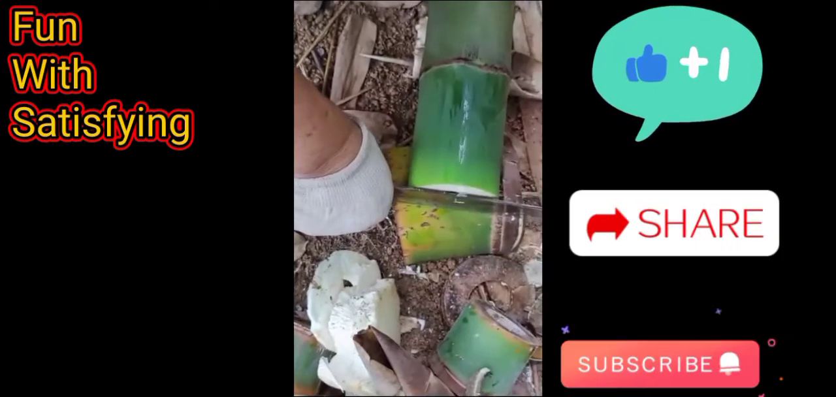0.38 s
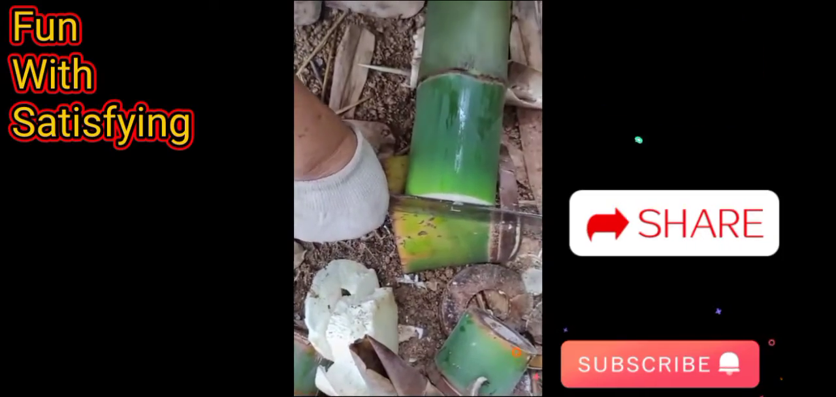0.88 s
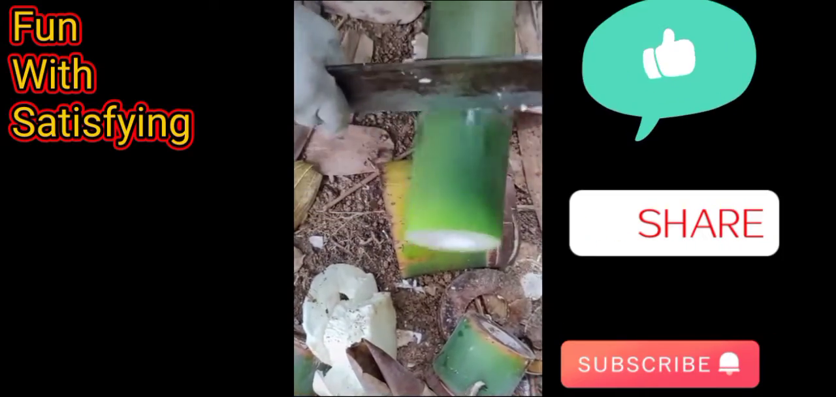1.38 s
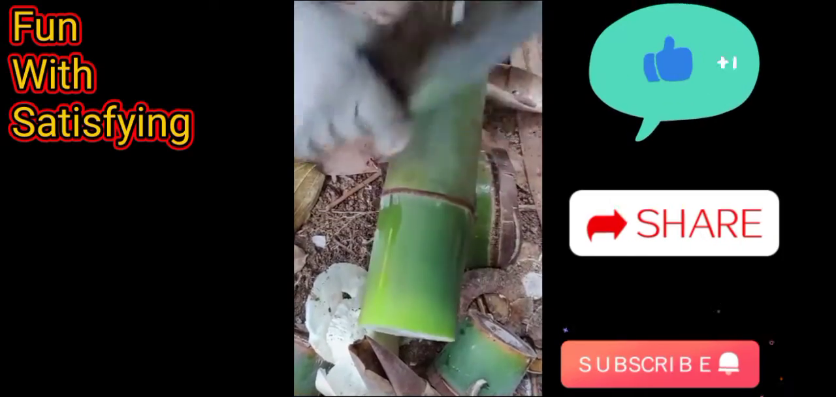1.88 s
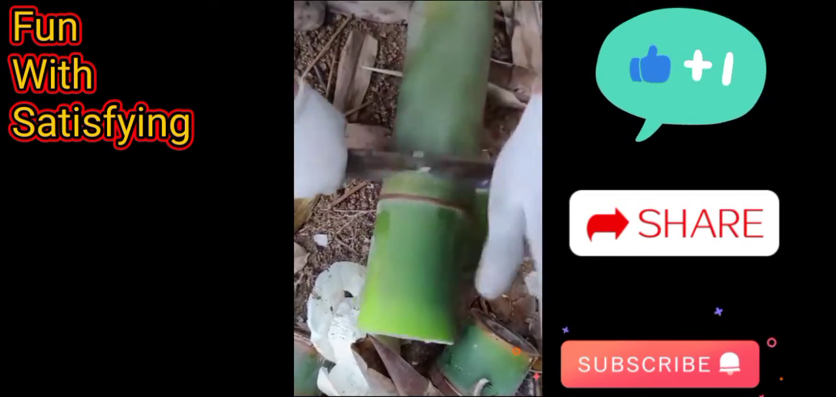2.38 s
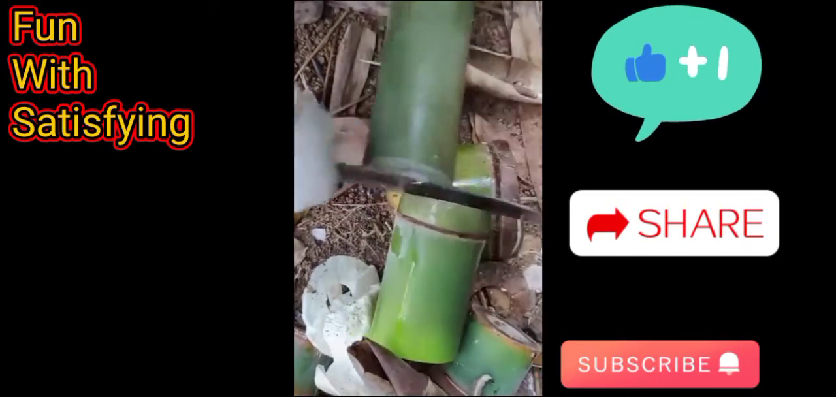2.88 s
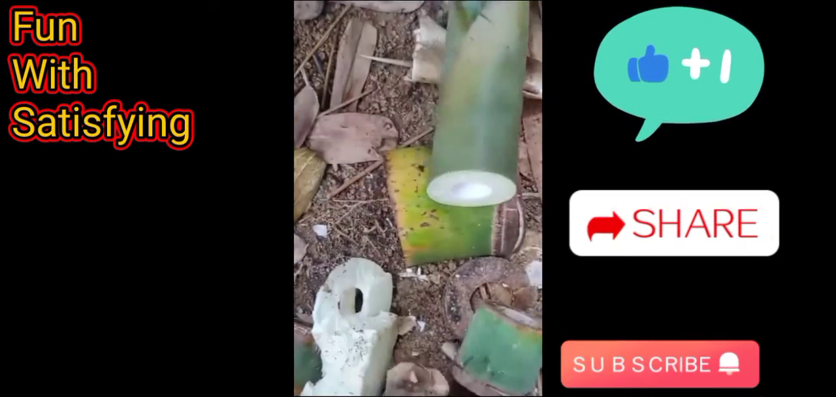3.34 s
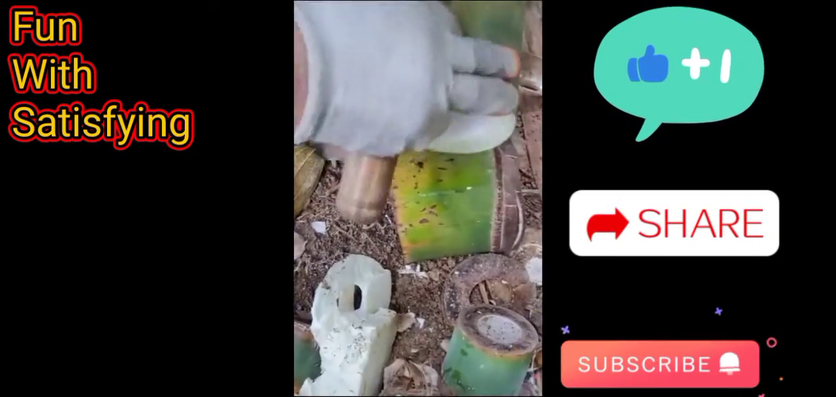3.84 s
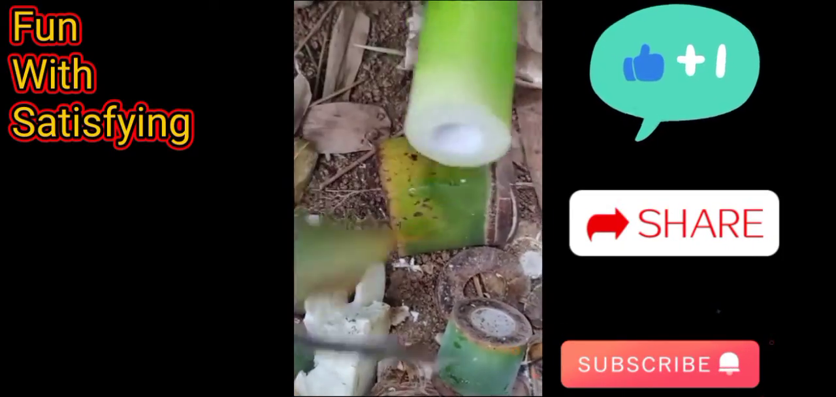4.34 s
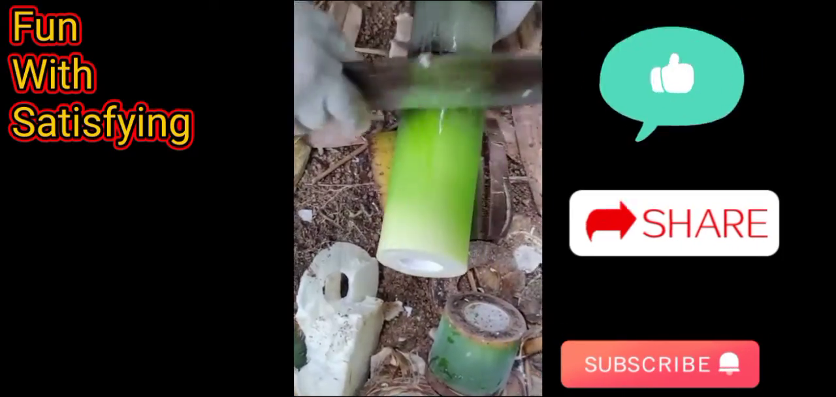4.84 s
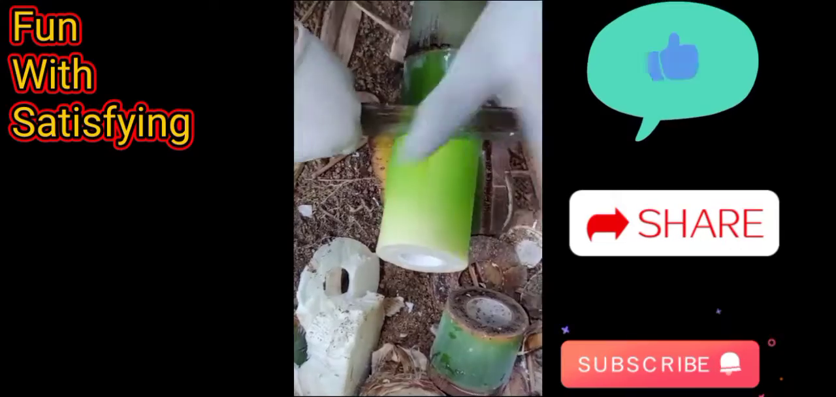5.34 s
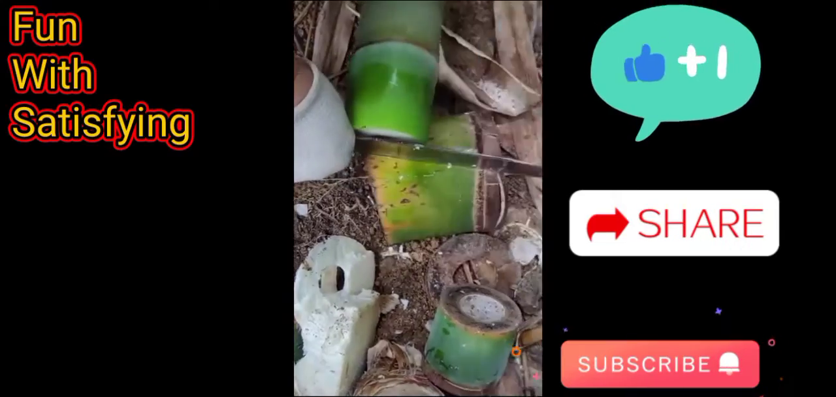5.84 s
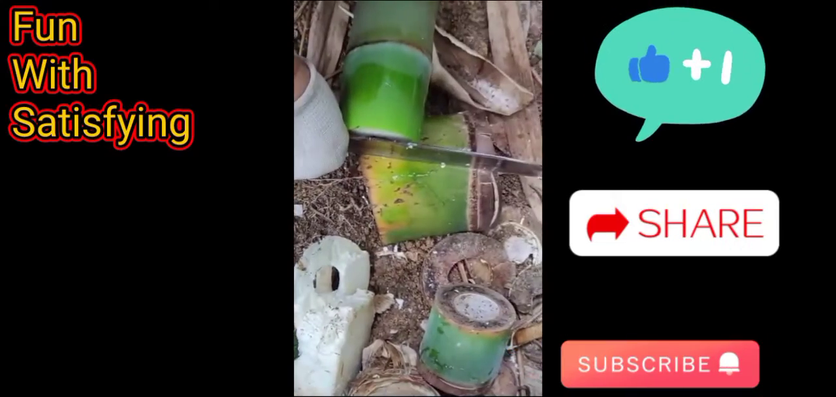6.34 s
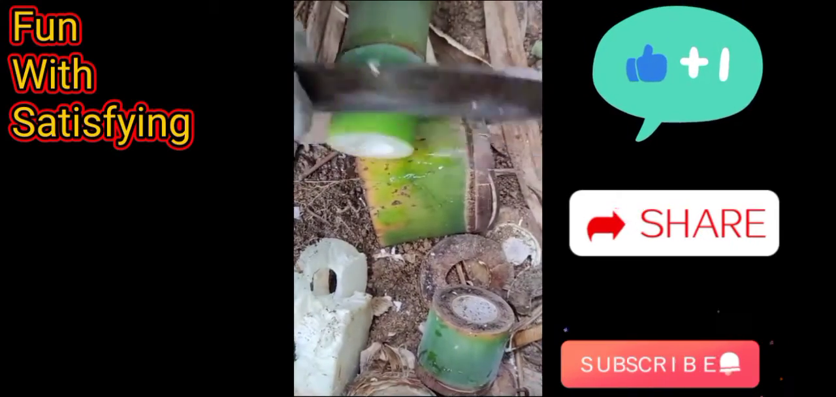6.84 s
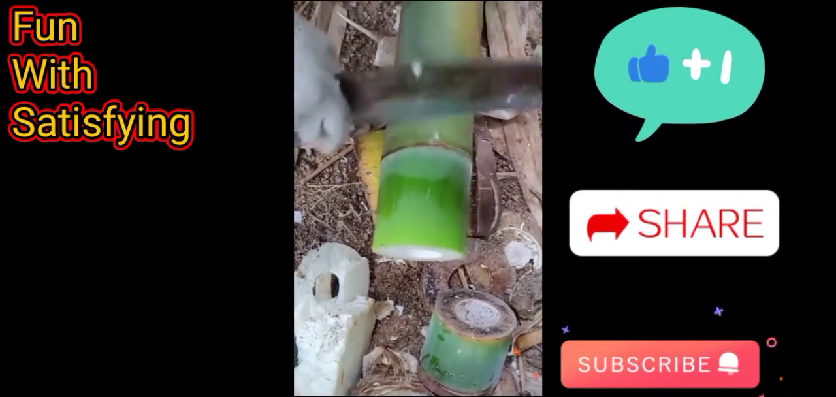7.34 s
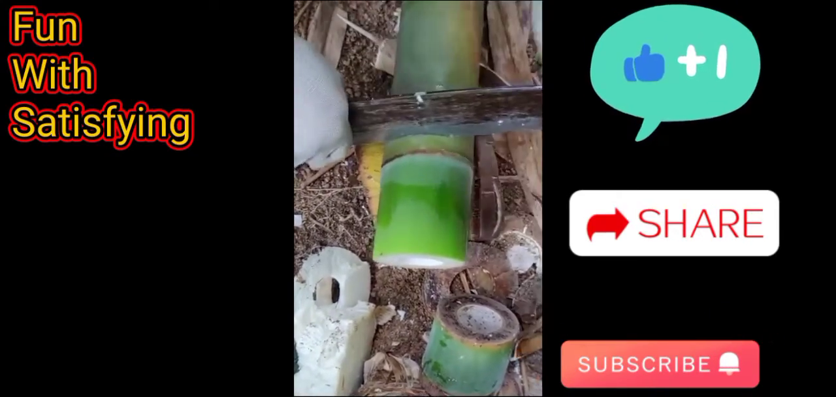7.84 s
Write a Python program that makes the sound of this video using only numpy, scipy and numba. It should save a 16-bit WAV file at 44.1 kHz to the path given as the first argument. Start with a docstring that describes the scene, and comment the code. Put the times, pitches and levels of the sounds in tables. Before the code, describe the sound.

Near microphone, no room echo, only slight scatter from leaves and ground. Green bamboo splits in brief bursts: a single cut, a denser crackling run of hollow knocks, a quieter handling passage with thumps and small squeaks, then more bright cracks and a short creak. A heavy low thump follows, and the last cut ends in rapid snapping and high metallic shimmer. Soft wind and distant insects underneath.

```python
"""Low wind rumble, far insects and a faint rustle; then a long knife is pressed through green bamboo outdoors.
Fibres crunch and crack: random snaps and clicks excite the wall, fine grain and hollow section.
Blade and pieces thud on the soil (swinging sines) and the stalk's air column hums after.
The blade creaks (pulse train) and rings (narrow steel modes).
Thin chirps, squeaks and swishes are noise through gliding resonances."""
import sys
import numpy as np
from scipy import signal
from scipy.fft import rfft, irfft, next_fast_len
from scipy.io import wavfile
from scipy.ndimage import uniform_filter1d
from numba import njit

SR = 44100
rng = np.random.default_rng(int(sys.argv[2]) if len(sys.argv) > 2 else 0)


def waveform_to_disk(signal):
    """Save audio, clipped to [-1, 1], as 16-bit WAV at the path in sys.argv[1]."""
    frames = np.transpose(np.atleast_2d(signal))
    scaled = np.clip(frames, -1, 1) * 32767
    samples = np.round(scaled).astype(np.int16)
    wavfile.write(sys.argv[1], SR, samples)


def ratio_of_db(decibels):
    """Turn decibels (scalar or array-like) into linear amplitude factors; 0 dB maps to 1."""
    return 10 ** (np.asarray(decibels, float) / 20)


N = 362061
TIME = np.arange(N) / SR


def level(x, db):
    """Scale to an rms level."""
    return x * ratio_of_db(db) / np.sqrt(np.mean(x ** 2))


def crest(x, db):
    """Scale to a peak level."""
    return x * ratio_of_db(db) / np.max(np.abs(x))


def add(track, s, x):
    """Mix a short sound in at time s."""
    i = max(int(s * SR), 0)
    track[i:i + len(x)] += x[:max(N - i, 0)]


def curve(rows):
    """Columns of a table, one value per sample."""
    s, *columns = np.transpose(rows)
    return [np.interp(TIME, s, c) for c in columns]


@njit
def svf(x, hz, width):
    """State-variable band-pass with moving centre and width, gain 1 at the centre."""
    y, b, l = np.empty(len(x)), 0., 0.
    for i in range(len(x)):
        g, k = np.tan(np.pi * hz[i] / SR), width[i] / hz[i]
        v = (b + g * (x[i] - l)) / (1 + g * (g + k))
        b, l, y[i] = 2 * v - b, l + 2 * g * v, k * v
    return y


def band(x, hz, width):
    """Fixed band-pass."""
    return svf(x, np.full(len(x), 1. * hz), np.full(len(x), 1. * width))


def colour(x, points):
    """Shape by a spectrum drawn on log frequency."""
    hz, db = np.transpose(points)
    size = next_fast_len(len(x))
    f = np.arange(size // 2 + 1) * SR / size + 1
    gain = ratio_of_db(np.interp(np.log(f), np.log(hz), db))
    return irfft(rfft(x, size) * gain, size)[:len(x)]


def walk(rate):
    """Random levels held 1 / rate s and slewed twice; spread near 1."""
    k = int(SR / rate)
    steps = np.repeat(rng.standard_normal(N // k + 1), k)
    return 1.17 * uniform_filter1d(uniform_filter1d(steps, k), k)[:N]


# far hiss spectrum: (frequency [Hz], relative density [dB per Hz])
AIR_SPECTRUM = [(15, -40), (25, -8), (70, 1.5), (123, -16.5), (175, -9.5), (236, -16), (1940, -40),
                (4140, -45.5), (5140, -27.5), (7510, -48.5), (8830, -28), (9570, -40), (14800, -38),
                (16000, -38.5)]
# rumble before the low cut: (time [s], level [dB])
GUST = [(0, -65.5), (1.1, -70), (2.2, -67.5), (5.5, -64), (8.21, -64)]


def outdoors():
    """Far hiss with two insect bands, and gusty wind rumble, with the deepest bass cut."""
    hiss = level(colour(rng.standard_normal(N), AIR_SPECTRUM), -65)
    air = hiss * ratio_of_db(1.8 * walk(5))
    gusts = rng.standard_normal(N) * ratio_of_db(3 * walk(12))
    wind = band(band(gusts, 66, 50), 75, 120)
    gust_db, = curve(GUST)
    low_cut = signal.butter(4, 46, "highpass", fs=SR, output="sos")
    return signal.sosfilt(low_cut, air + level(wind, 0) * ratio_of_db(gust_db))


# thin chirps, squeaks and swishes:
# (time [s], length [s], start [Hz], end [Hz], width [Hz], rms before fades [dB])
SWISH = [(0.045, 0.056, 3590, 3330, 490, -65.5), (0.118, 0.055, 3430, 3280, 490, -64),
         (2.064, 0.04, 2960, 2910, 140, -48), (4.263, .078, 3310, 3240, 240, -52.5),
         (4.315, .029, 885, 905, 140, -46.5), (5.063, .023, 1085, 1075, 110, -45.5),
         (5.107, 0.025, 3360, 3790, 190, -57.5), (5.127, .023, 3310, 3010, 140, -54.5),
         (5.1265, .023, 6340, 6160, 190, -57.5), (5.495, .027, 1410, 3890, 140, -62),
         (5.633, .013, 2710, 2690, 240, -67.5), (5.667, .024, 3360, 3310, 240, -69.5),
         (5.837, .079, 2180, 2160, 490, -73.5), (6.672, 0.036, 3740, 3760, 90, -66),
         (6.747, .029, 3140, 3060, 190, -47), (7.396, .024, 885, 905, 85, -54.5),
         (7.421, .064, 1855, 1895, 140, -60.5)]


def swishes():
    """Thin chirps, squeaks and swishes, some perhaps insect or bird, others rubbing: noise in a gliding resonance."""
    out = np.zeros(N)
    for s, length_s, hz0, hz1, width_hz, db in SWISH:
        size = int(length_s * SR)
        glide = np.linspace(hz0, hz1, size)
        swish = svf(rng.standard_normal(8192)[:size], glide, np.full(size, 1. * width_hz))
        add(out, s, level(swish, db) * np.sqrt(np.hanning(size)))
    return out


BLADE_HZ, BLADE_WIDTH_HZ = 12000, 110
# ring of the sliding blade: (time [s], level [dB])
BLADE = [(7.9, -63), (7.93, -80), (7.955, -70), (7.97, -46), (8.04, -41), (8.06, -61), (8.08, -53),
         (8.1, -71)]
# fainter steel modes: (centre [Hz], width [Hz], gain re main mode [dB])
STEEL = [(10170, 300, -12), (11200, 200, -12), (13100, 200, -19), (15200, 300, -20)]


def blade():
    """Narrow high modes of the steel, excited in fits by the sliding."""
    db, = curve(BLADE)
    sliding = (TIME > BLADE[0][0]) & (TIME < BLADE[-1][0])
    fits = rng.standard_normal(N) * ratio_of_db(3.5 * walk(120))
    ring = band(fits, BLADE_HZ, BLADE_WIDTH_HZ)
    for hz, width_hz, mode_db in STEEL:
        ring = ring + ratio_of_db(mode_db) * band(fits, hz, width_hz)
    return level(ring, 0) * ratio_of_db(db) * sliding


# wall modes: (centre [Hz], width [Hz], gain before the broad band-pass [dB])
FIBRE = [(1500, 860, -18.5), (2335, 1470, -10.5), (3115, 343, 1), (3520, 1190, 1.5), (4053, 1740, -4)]


def fibre(x):
    """The broad resonances of the green wall, which is too stiff to give much bass."""
    modes = sum((-1) ** k * ratio_of_db(db) * band(x, hz, width) for k, (hz, width, db) in enumerate(FIBRE))
    return band(modes, 2280, 4870)


# fine-grain spectrum: (frequency [Hz], relative density [dB per Hz])
HISS = [(2650, -40), (4500, 6), (4600, -3.5), (5140, -14.5), (5280, -6), (6700, -2), (8030, -9),
        (11500, -5), (14500, -8), (16000, -30)]


def grain(x):
    """The fine grain answers with a treble-heavy hiss."""
    return colour(x, HISS)


# blade sticking and slipping in the cut:
# (start [s], end [s], start rate [slips/s], end rate [slips/s], peak [dB])
CREAK = (6.885, 6.93, 290, 340, -30)


def creak():
    """Nearly regular slips, each ringing the wall."""
    start, end, rate0, rate1, db = CREAK
    slips, s = np.zeros(N), start
    for jitter, size in rng.standard_normal((40, 2)):
        if s < end:
            slips[int(s * SR)] = ratio_of_db(2.0 * size - 6 * (s - start) / (end - start))
        s += (1 + 0.045 * jitter) / np.interp(s, (start, end), (rate0, rate1))
    ring = 5.7 * band(slips, 3300, 320)
    return crest(fibre(slips) + ring + ratio_of_db(-7.0) * grain(slips), db)


# blows into the soil: (crest time [s], peak [dB], settled swing [Hz], cycles to fall about 20 dB)
THUDS = [(0.437, -27, 83, 0.58), (0.82, -39, 72.3, 1.9), (1.834, -43, 101, 1.3), (2.0606, -22.5, 298, 0.76),
         (2.142, -41.5, 88, 1.7), (3.093, -33.5, 121, 1.1), (3.477, -26.5, 85.5, 0.92),
         (3.52, -46, 110, 0.89), (3.918, -47.5, 119, 1.2), (4.344, -29.5, 95.6, 1.5),
         (5.0717, -33, 95, 3.3), (5.238, -51.5, 149, 7.2), (5.9303, -24.5, 100, 0.94),
         (5.959, -33.5, 106.6, 3.1), (6.389, -33, 70.3, 2.6), (6.72, -45, 67, 2.7),
         (7.546, -46.5, 73.6, 2.8), (7.621, -21.5, 102, 0.76)]
# air column of the long stalk, knocked: (time [s], sine level before decay [dB], pitch [Hz], t60 [s])
TUBE = [(1.289, -52.5, 378, 0.19), (1.72, -56, 421, 0.25), (3.476, -44.5, 452, 0.19),
        (3.85, -47, 450, 0.27), (4.251, -53, 425, 0.29), (5.3, -69, 458, 0.76), (7.625, -35.5, 606, 0.066)]


def thuds():
    """The soil dips, springs back fast to one crest and swings out ever slower; the stalk's air column hums after."""
    out = np.zeros(N)
    t = np.arange(-int(.02 * SR), int(.1 * SR)) / SR
    after = np.maximum(t, 0)
    for s, db, hz, cycles in THUDS:
        swing_s = t + 0.00054 * (1 - np.exp(-after / 0.0011))
        turns = hz * np.where(t < 0, 1.85 * t, swing_s)
        decay = np.exp(-after * hz / max(cycles, .2) * 2.24)
        shape = np.where(t < 0, np.exp(-(turns / 0.5) ** 4), decay)
        add(out, s + t[0], ratio_of_db(db) * shape * np.cos(2 * np.pi * turns))
    t = np.arange(int(.5 * SR)) / SR
    onset = 1 - np.exp(-t / 0.0036)
    for (s, db, hz, t60), rough in zip(TUBE, rng.standard_normal((len(TUBE), len(t)))):
        hum = np.sin(2 * np.pi * hz * t) + level(band(rough, hz, 70), -8)
        add(out, s, ratio_of_db(db) * hum * np.exp(-np.log(1000) * t / t60) * onset)
    return out


HELD_SHARE, HELD_AFTER_S = 0.6, .11
# blade pressed through the wall:
# (start [s], length [s], crunch at end [dB], swell [dB], drone re crunch [dB])
CUTS = [(1.196, 0.075, -37, 8.5, -6), (2.683, 0.088, -43, 11.5, -5.5), (4.25, 0.094, -48, 10, 0),
        (6.722, 0.11, -44, 3.5, -2.5), (7.966, 0.12, -40, 13.5, -10)]


def held(s):
    """The blade in the cut holds the wall: share of its free length that a crack lasts at time s."""
    in_cut = any(start < s < start + length + HELD_AFTER_S for start, length, *_ in CUTS)
    return HELD_SHARE if in_cut else 1


SPLINTERS_PER_S = 60
SPLINTER_DB, SPLINTER_SPREAD_DB = 2, 2  # least level over the crunch, mean random excess


def splinters():
    """Small cracks at random moments of each cut, rising with the swell of its crunch."""
    rows, (when, pitch, _) = [], np.transpose(SECTION)
    for s, length, db, swell_db, drone_db in CUTS:
        for place, a, b, c in rng.random((20, 4))[:int(SPLINTERS_PER_S * length)]:
            pressed_db = db - swell_db * (1 - place)
            sizes = pressed_db + SPLINTER_DB - SPLINTER_SPREAD_DB * np.log([a, b, c])
            at = s + place * length
            hz = np.interp(at, when, pitch) * 2 ** (c - .5)
            rows.append((at, sizes[0], sizes[1], sizes[2] + drone_db - 8, hz))
    return rows


CRACK_MS, CRACK_CYCLES = 2.0, 2.5  # free time to fall about 10 dB: fixed part + cycles of the hollow
CLICK = 5.17  # first click, re rms of the splintering noise
# cracks and knocks:
# (time [s], wall peak [dB], snap peak + 0.5 [dB], hollow peak [dB], hollow pitch [Hz])
CRACKS = [(0.4289, -53, -45, -42, 396), (0.626, -65, -71, -56.5, 543), (0.8086, -28, -21.5, -36.5, 1430),
          (0.812, -45, -27.5, -38.5, 820), (0.8177, -41, -45, -45.5, 483), (0.831, -39, -27.5, -46, 1270),
          (1.235, -31, -26, -41, 1170), (1.2728, -39, -20, -36, 1480), (1.668, -53, -52, -58, 1000),
          (1.728, -58, -60, -56, 900), (1.8329, -60, -49, -35, 1020), (1.866, -39.5, -50, -47.5, 690),
          (1.915, -61, -60, -45.5, 2050), (2.0595, -28.5, -35, -31, 640), (2.073, -40, -48, -42, 800),
          (2.134, -50, -60, -43, 805), (2.156, -57, -62, -55, 900), (2.186, -62, -56, -48.5, 614),
          (2.203, -48, -58, -65, 1280), (2.249, -62, -66, -54, 700), (2.341, -59, -62, -63, 1390),
          (2.362, -60, -62, -65, 1490), (2.428, -57, -62, -78, 2000), (2.478, -56, -64, -75, 2000),
          (2.627, -46.5, -55, -54, 1390), (2.6841, -34.5, -43, -55, 1870), (2.7331, -27, -24, -35.5, 2050),
          (2.75, -27, -26, -44, 1450), (2.7615, -25, -31, -29.5, 1860), (2.7898, -30, -48.5, -29.5, 644),
          (2.7937, -27.5, -43, -28.5, 1480), (2.82, -33, -25, -51, 2000), (2.8653, -21, -28.5, -22, 863),
          (2.899, -47, -53, -39, 810), (2.9764, -37, -44, -47, 884), (3.0258, -39, -40.5, -37, 784),
          (3.043, -54, -45, -39.5, 865), (3.0882, -42, -46, -25, 780), (3.0925, -31, -42, -29, 795),
          (3.0964, -35, -46, -26, 813), (3.1418, -30.5, -32, -21, 782), (3.185, -46, -53, -56, 690),
          (3.2132, -29, -28.5, -27.5, 816), (3.2175, -56, -49.5, -35, 775), (3.2567, -46, -38.5, -40, 730),
          (3.282, -58, -56, -42.5, 780), (3.303, -61, -58, -52, 734), (3.423, -48, -54, -38.5, 660),
          (3.4395, -30.5, -31, -35, 728), (3.4718, -54, -46, -40.5, 470), (3.6317, -52, -67, -50.5, 757),
          (3.9, -56, -58, -51, 760), (3.849, -43, -41, -40.5, 1130), (3.8538, -42, -38.5, -46, 440),
          (4.3425, -50, -33, -30.5, 876), (4.352, -45, -47, -41, 890), (4.963, -64.5, -69, -77.5, 2020),
          (5.031, -55, -60, -61, 900), (5.068, -70, -73, -36, 690), (5.098, -62, -66, -47.5, 595),
          (5.13, -62, -60, -48, 490), (5.129, -66, -66, -48, 1030), (5.149, -45, -53, -60, 1500),
          (5.153, -65, -65, -52, 1060), (5.218, -80, -75, -52, 550), (5.323, -80, -75, -58, 800),
          (5.5227, -55, -51.5, -57, 765), (5.619, -63, -64, -52.5, 870), (5.9255, -70, -66, -38, 995),
          (6.023, -59, -60, -71.5, 1950), (6.3825, -35.5, -33.5, -33, 1040), (6.386, -35, -26, -29, 1040),
          (6.396, -42, -45, -41, 1306), (6.782, -27.5, -23, -38, 970), (6.821, -25, -44.5, -48.5, 1950),
          (6.8276, -27, -17, -31, 1880), (6.831, -30, -24, -33, 1900), (6.8703, -30.5, -39, -64, 1810),
          (6.8735, -49, -23.5, -31, 1880), (6.9473, -38, -43, -71.5, 2030), (7.0067, -54, -48, -64, 960),
          (7.2135, -48, -41.5, -49, 1620), (7.2535, -37, -36, -57, 940), (7.3256, -38, -25, -47, 870),
          (7.332, -37, -22.5, -43, 880), (7.342, -27, -21.5, -37.5, 930), (7.4415, -39, -28, -41, 930),
          (7.469, -54, -52, -47, 910), (7.559, -62, -62, -49, 900), (7.6156, -40, -39, -36, 414),
          (7.8744, -44, -37.5, -55.5, 582), (7.9706, -56, -37, -69, 1546),
          (8.052, -26.5, -36.5, -37.5, 626), (8.0806, -23, -33, -26, 1715), (8.0993, -26, -24, -35, 1800),
          (8.112, -33, -26, -39, 1580), (8.1254, -29, -33, -23, 1640), (8.1372, -27.5, -28, -34.5, 1470),
          (8.1435, -30, -43.5, -32, 1620), (8.16, -52, -43, -34, 1610), (8.1713, -46, -55, -37, 1560),
          (8.1954, -34, -33.5, -31, 1550)]


def cracks():
    """A break is a click with a short splintering tail; the hollow rings on a little longer."""
    out = np.zeros(N)
    t = np.arange(int(.05 * SR)) / SR
    lead = 64  # samples ahead of the click, for the grain's pre-ring
    click = 1. * (np.arange(len(t)) == lead)
    wall, snap = fibre(click), grain(click)
    rows = CRACKS + splinters()
    for (s, wall_db, snap_db, hollow_db, hz), noise in zip(rows, rng.standard_normal((len(rows), len(t)))):
        free = held(s)
        ms = free * (CRACK_MS + CRACK_CYCLES * 1000 / hz)
        burst = noise * np.exp(-t * 1200 / max(ms, .3))
        burst[0] += CLICK
        for answer, db in ((wall, wall_db), (snap, snap_db - 0.5)):
            add(out, s - lead / SR, crest(signal.fftconvolve(burst, answer)[:len(t)], db))
        decay = np.exp(-t / (free * 2.0 / hz + ms / 2500))
        onset = 1 - np.exp(-t / free ** 2 / 0.0013)
        ring = np.sin(2 * np.pi * hz * t) * decay * onset
        knock = band(band(burst, hz, 0.95 * hz), hz, 1.9 * hz)
        add(out, s, crest(crest(ring, 0) + 1.09 * crest(knock, 0), hollow_db))
    return out


def patchy(x, patchy_db):
    """The torn surface rings with many narrow modes that come and go as the contact moves."""
    out = 0
    for k, hz in enumerate(1200 * 2 ** (np.arange(38) / 10)):
        b, a = signal.iirpeak(hz, 18, fs=SR)
        out = out + (-1) ** k * signal.lfilter(b, a, x) * ratio_of_db(patchy_db * walk(28))
    return out


def hump(start, end, rise, fall, swell_db):
    """Gain that rises to start, swells until end and falls away, straight in dB; rise, fall: s per 20 dB."""
    rise, fall = max(rise, .001), max(fall, .001)
    times = (start - 3 * rise, start, end, end + 3 * fall)
    return ratio_of_db(np.interp(TIME, times, (-60 - swell_db, -swell_db, 0, -60), left=-200, right=-200))


# hands, stalk and leaves: (time [s], crunch [dB], hiss re crunch [dB], drone re crunch [dB])
RUSTLE = [(0, -70, -1, -5.5), (0.42, -66, 0.5, -10), (0.52, -76.5, -1, 0), (0.76, -93, 9, 3),
          (0.89, -75, -2.5, -11), (1.45, -71, -5.5, -2.5), (1.93, -67, 3, -2), (2.03, -58.5, 1.5, -0.5),
          (2.25, -70, -3.5, 2.5), (2.6, -77.5, -1.5, -7), (2.84, -52.5, -10.5, -5), (2.95, -57.5, -6.5, -4),
          (3.02, -60, -5.5, 6), (3.17, -63.5, -2, 0), (3.33, -65.5, -3, -7), (3.67, -72.5, -11, 2),
          (3.93, -60.5, -7, -0.5), (4.03, -84, -2, 6.5), (4.45, -75, -2.5, -6), (4.99, -100, -3.5, 8.5),
          (5.2, -80, -5.5, 8.5), (6.36, -86, -5, -10), (7.1, -82.5, -2, -1), (7.3, -69, -2.5, -16),
          (7.8, -78, 1.5, -4), (8.21, -76, 4, -4)]
CUT_BITE_S, CUT_RELEASE_S, CUT_HISS_DB = 0.011, 0.027, 0  # s per 20 dB; hiss re crunch
# blade and pieces scraping: (crest time [s], rise per 20 dB [s], fall per 20 dB [s],
# crunch [dB], hiss re crunch [dB], drone re crunch [dB])
SCRAPES = [(0.005, 0.0073, 0.05, -68, -12, 8.5), (1.574, 0.033, 0.11, -61, 0, -12),
           (1.85, 0.19, 0.25, -53.5, -3, -7.5), (2.099, 0.064, 0.025, -46, 3, -3.5),
           (2.196, 0.43, 0.043, -61, -13, 0), (2.625, 0.0085, 0.036, -59.5, 1.5, -1),
           (3.095, 0.048, 0.061, -48.5, -4.5, 10.5), (3.153, 0.18, 0.023, -51, -9, -7),
           (3.254, 0.023, 0.064, -51, -6, 3), (3.439, 0.037, 0.26, -57, -4.5, -6),
           (3.718, 0.024, 0.094, -58.5, -7.5, -5), (3.88, 0.031, 0.49, -73.5, -8.5, -1),
           (5.02, 0.015, 0.19, -65.5, -5, 5), (5.101, 0.081, 0.068, -65.5, -11, 13.5),
           (5.147, 0.13, 0.032, -67, 2.5, -1), (5.524, 0.057, 0.49, -74.5, 2.5, 7.5),
           (5.611, 0.22, 0.44, -83, -4, 7), (5.942, 0.12, 0.087, -64.5, -2, -1),
           (6.858, .015, 0.027, -48.5, 0.5, 0), (6.925, 0.072, 0.016, -50, -17, -14),
           (6.95, 0.056, 0.25, -67.5, -3, -9), (7.131, 0.024, 0.14, -66.5, 5.5, -11),
           (7.251, 0.0094, 0.2, -57, -1, -2), (7.336, 0.029, 0.14, -49.5, -1, -3.5),
           (7.459, 0.11, 0.034, -57.5, 4.5, -5), (7.554, 0.041, 0.094, -59.5, -0.5, 0.5),
           (7.628, 0.022, 0.07, -58.5, -3, 5), (8.125, 0.09, 0.02, -46, -9, 12),
           (8.209, 0.07, .05, -53, -9, 4)]
# fibres settling after a crack, re its CRACKS levels: (wall [dB], hiss [dB], drone [dB])
TAIL_DB = (-26, -23.5, -22)
TAIL_S = 0.022  # free time to fall 20 dB


def effort():
    """Gains of crunch, hiss and drone: rustle, cuts, scrapes and the settling after cracks add in power."""
    crunch_db, hiss_db, drone_db = curve(RUSTLE)
    power = ratio_of_db([crunch_db, crunch_db + hiss_db, crunch_db + drone_db]) ** 2
    shares = []
    for s, length, db, swell_db, drone_db in CUTS:
        shape = (s, s + length, CUT_BITE_S, CUT_RELEASE_S, swell_db)
        shares.append((shape, db + np.array([0, CUT_HISS_DB, drone_db])))
    for s, rise, fall, db, hiss_db, drone_db in SCRAPES:
        shares.append(((s, s, rise, fall, 0), db + np.array([0, hiss_db, drone_db])))
    for shape, db in shares:
        power += (ratio_of_db(db)[:, None] * hump(*shape)) ** 2
    t = np.arange(int(.1 * SR)) / SR
    for s, *peaks_db, _ in CRACKS:
        for track, db, below_db in zip(power, peaks_db, TAIL_DB):
            add(track, s, ratio_of_db(db + below_db - 20 * t / TAIL_S / held(s)) ** 2)
    return np.sqrt(power)


# open section nearest the blade: (time [s], mean pitch [Hz], width of the first band-pass [Hz])
SECTION = [(0, 870, 672), (1.3, 900, 900), (2.7, 894, 700), (2.95, 790, 122.4), (4.0, 765, 158),
           (4.25, 920, 1000), (4.33, 885, 300), (5.1, 850, 468), (5.7, 650, 487), (5.93, 950, 398),
           (6.7, 1025, 400), (6.79, 990, 300), (6.85, 1530, 913), (7.25, 910, 120), (7.6, 890, 201),
           (8.0, 1230, 1310), (8.21, 1400, 1125)]


def rubbing():
    """Many small fibres snap at random, a few much louder; wall, fine grain and hollow section all answer."""
    crunch, hiss, drone = effort()
    snaps_per_s = 2500
    sizes = rng.standard_normal(N) * ratio_of_db(1.7 * rng.exponential(size=N))
    snaps = (rng.random(N) < snaps_per_s / SR) * sizes
    unevenness = ratio_of_db(2.5 * walk(150) + 1.2 * walk(60))
    grit = (level(snaps, 0) + .8 * rng.standard_normal(N)) * unevenness
    torn = patchy(grit, patchy_db=2.6)
    hz, width = curve(SECTION)
    hz = hz * (1 + 0.027 * walk(16))
    hollow = svf(svf(grit, hz, width), hz, 9.9 * width)
    hollow = hollow / np.sqrt(width) * ratio_of_db(3.5 * walk(45))
    return crunch * level(fibre(torn), 0) + hiss * level(grain(torn), 0) + drone * level(hollow, 0)


def scene():
    """Near sounds get a faint scatter from leaves and ground."""
    near = rubbing() + cracks() + thuds() + creak() + swishes() + blade()
    t = np.arange(int(.12 * SR)) / SR
    scatter = rng.standard_normal(len(t)) * np.exp(-t / .016) * (t > .002)
    wet = signal.fftconvolve(near, scatter / np.sqrt(np.sum(scatter ** 2)))[:N]
    return (near + ratio_of_db(-19) * wet + outdoors())[None]


def band_limit(x):
    """A steep low-pass at the top of the band."""
    return signal.sosfilt(signal.butter(12, 16670, fs=SR, output="sos"), x)


def record(dry):
    """Hand on the finished mix."""
    return band_limit(dry)


dry = scene()
out = record(dry)
waveform_to_disk(out)
```